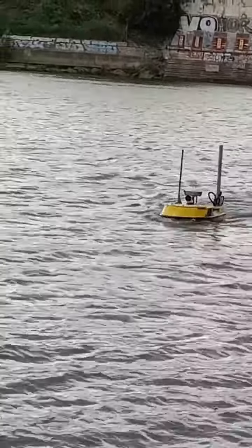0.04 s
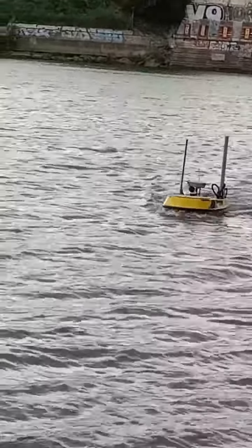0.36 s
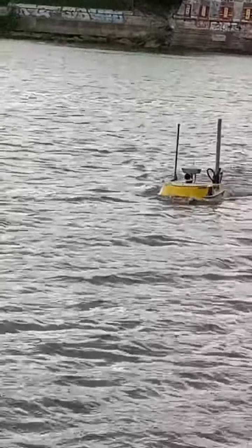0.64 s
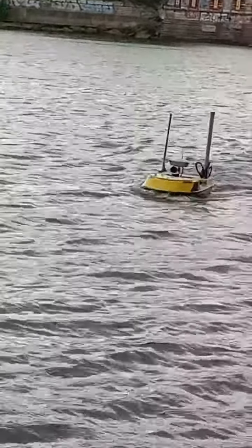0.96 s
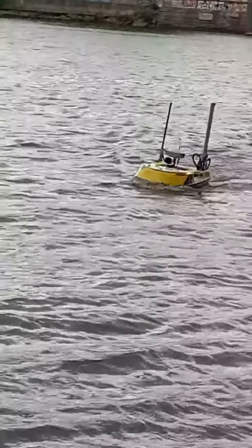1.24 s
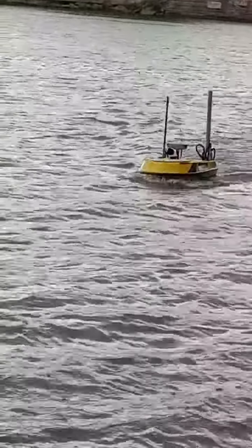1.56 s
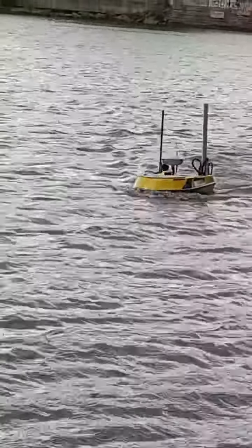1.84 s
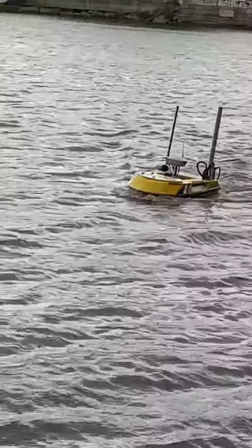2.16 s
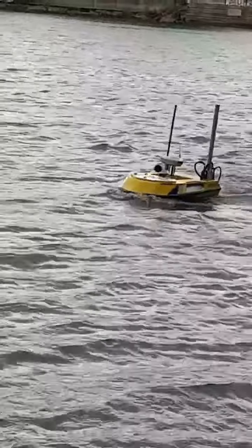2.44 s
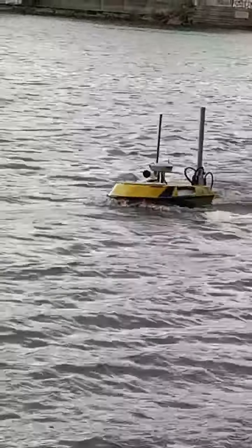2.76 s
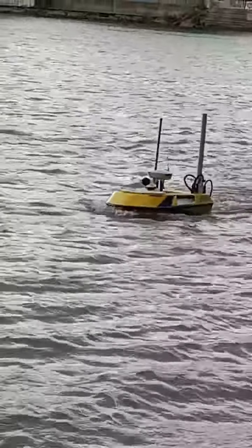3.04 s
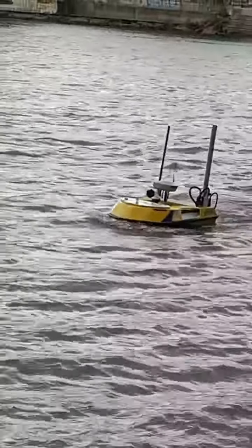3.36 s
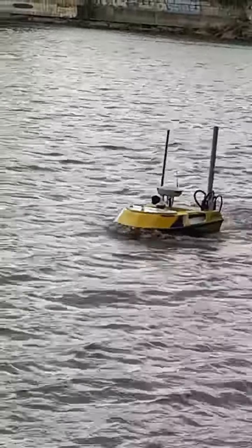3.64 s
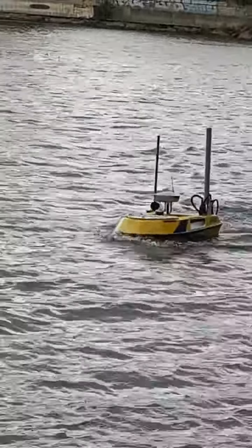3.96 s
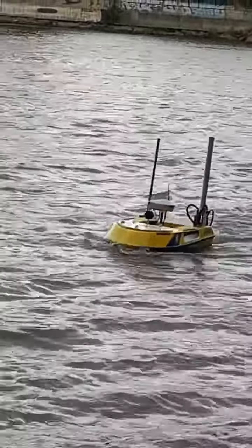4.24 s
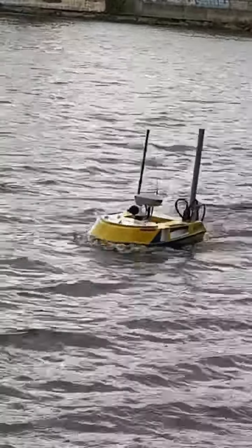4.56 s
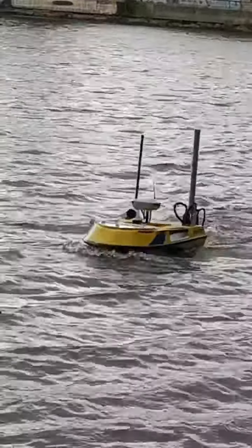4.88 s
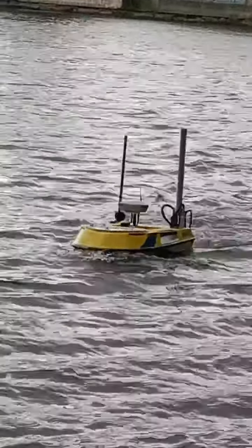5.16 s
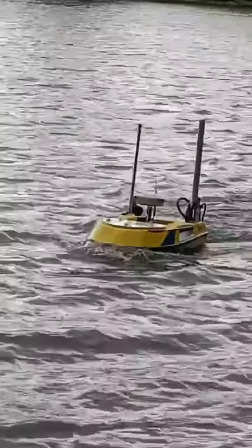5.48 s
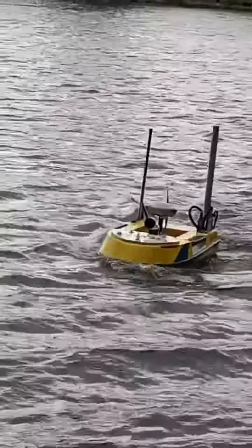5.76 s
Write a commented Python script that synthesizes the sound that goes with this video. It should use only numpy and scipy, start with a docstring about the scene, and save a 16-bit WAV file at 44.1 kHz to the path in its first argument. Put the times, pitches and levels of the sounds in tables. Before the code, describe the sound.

Strong wind buffets a hand-held microphone on a river bank for about six seconds, a loud low rumble with irregular thumps and flaps from the start. Behind it, choppy water washes and laps with small splashes and drips, and a small boat's motor gives a faint, high, wavering whine. From about 1.2 seconds the gust builds with a hollow boom and short rough rasps, peaking near 1.9 seconds, where the sound is briefly squashed. The rasps continue until about 2.7 seconds. The whine fades almost away near 2.8 seconds and is back by 3.8. Small waves tumble over in short grainy rushes from 3.7 to 4 seconds. Three faint, very high, raspy chirps pass between 4.1 and 4.6 seconds as the wind eases. A softer rumble with occasional thumps continues over the water and whine, with one small splash just before the end.

```python
"""Strong wind buffets a hand-held microphone on a river bank. From the start, eddies thump and flap on
its port; behind them choppy water washes and splashes, and a small survey boat whines faintly.
The gust builds with a hollow boom and a rasp, peaks near 1.9 s and drives the limiter.
The whine fades and returns, waves tumble over from 3.7 s, and three very high chirps pass
from 4.1 s as the wind eases."""
import sys
import numpy as np
from scipy import signal
from scipy.fft import rfft, irfft, next_fast_len
from scipy.io import wavfile
from scipy.ndimage import uniform_filter1d, minimum_filter1d

SR = 44100
rng = np.random.default_rng(int(sys.argv[2]) if len(sys.argv) > 2 else 0)


def master(y):
    """Save y as 16-bit WAV."""
    cut = np.clip(np.atleast_2d(y).T, -1, 1)
    pcm = np.round(cut * 32767)  # scale
    wavfile.write(sys.argv[1], SR, pcm.astype(np.int16))


N = 265129
CUTOFF_HZ = 13100

# Wind force on the port. Each row: time in seconds, force in dB re the steady breeze.
GUST = [(0, 4.5), (.22, -0.5), (.33, 5), (.48, 3), (.68, 2.5), (.77, 4.5), (1.12, 3), (1.3, 5.5),
        (1.62, 6.5), (1.88, 11), (2.16, 4.5), (2.4, 6), (2.9, 5.5), (3.58, 4), (4.02, 4.5), (4.3, 0),
        (5.2, -0.5), (6.0, -2.5)]
# Single eddies. Each row: centre in seconds, length in seconds, pitch in Hz, relative peak in dB.
THUMPS = [(0.033, 0.037, 167, -3), (0.073, 0.022, 217, -2), (0.137, 0.03, 94.3, 0), (0.356, 0.022, 432, -7),
          (0.516, 0.014, 210, 2), (0.54, 0.049, 111, -2), (0.722, 0.048, 100, -6), (0.837, 0.035, 96, -2.5),
          (0.883, 0.035, 234, -0.5), (0.995, 0.042, 431, -6.5), (1.13, 0.014, 191.5, 3.5),
          (1.238, 0.024, 209, -4.5), (1.295, 0.036, 520, -14), (1.327, 0.0092, 421, 2),
          (1.354, 0.049, 165.8, 0.5), (1.4, .035, 448.6, -7), (1.475, 0.058, 181.3, -6),
          (1.56, 0.085, 184.6, -6), (1.756, 0.062, 480, -6), (1.811, 0.044, 335, -1),
          (2.025, 0.067, 175.1, -1), (2.15, .06, 114, -2), (2.313, 0.037, 204.7, -5.5),
          (3.208, 0.04, 112.4, -0.5), (3.281, 0.021, 173, 1.5), (3.412, 0.036, 110.5, -7),
          (3.846, 0.044, 80, -3), (4.53, 0.038, 210, -4.5), (4.923, 0.03, 105.3, -4.5),
          (5.575, 0.023, 93.7, 0.5), (5.87, 0.069, 83.2, -5.5), (5.973, 0.023, 106.3, -6)]
# Slaps of small eddies. Each row: start in seconds, relative peak in dB.
FLAPS = [(.06, -5.5), (.304, -4.5), (.369, -2), (.394, -4), (.448, 1), (.471, 1), (.497, -5), (.589, -2),
         (.749, -1.5), (.784, -4.5), (1.094, -7.5), (1.168, -4), (1.253, 0), (1.284, -2), (1.386, -2.5),
         (1.551, -1), (1.656, -6.5), (1.708, -7), (1.843, -11), (1.868, 0.5), (1.896, 5), (2.061, -3),
         (2.236, -3.5), (2.369, -10), (2.482, -9), (2.571, -7.5), (2.851, -8), (2.923, -6), (5.175, -4.5)]
# Choppy water. Each row: time in seconds, relative wash level in dB, relative spray level in dB.
CHOP = [(0, -31.5, -44), (1.2, -35.5, -48), (1.8, -36, -48.5), (2.0, -31, -43.5), (3.05, -32.5, -42.5),
        (3.55, -33, -44.5), (3.85, -28.5, -41), (4.25, -31.5, -45), (5.0, -32, -47.5), (6.0, -33.5, -46)]


def from_db(db):
    """Decibels to gain."""
    return 10 ** (np.asarray(db) / 20)


def unit_rms(x):
    """Scale to rms 1."""
    return x / np.sqrt(np.mean(x ** 2) + 1e-20)


def curves(rows):
    """Value columns of a time table, interpolated to every sample."""
    times_s, *columns = np.transpose(rows)
    return [np.interp(np.arange(N) / SR, times_s, column) for column in columns]


def swell(centre_s, length_s):
    """Gaussian bump: peak 1, length_s wide at 1/e."""
    return np.exp(-np.minimum((2 * (np.arange(N) / SR - centre_s) / length_s) ** 2, 60))


def drift(rate_hz):
    """Random wander, rms about 1, rolling off above rate_hz."""
    hop, settle = 40, 2000
    pole = np.exp(-2 * np.pi * hop * rate_hz / SR)
    noise = rng.standard_normal(N // hop + settle + 2)
    slow = signal.lfilter([1], [1, -2 * pole, pole * pole], noise)[settle:]
    return np.interp(np.arange(N) / hop, np.arange(len(slow)), unit_rms(slow))


def butterworth(x, hz, kind, order=2):
    """Low- or high-pass."""
    return signal.sosfilt(signal.butter(order, hz, kind, fs=SR, output="sos"), x)


def resonance(x, hz, width_hz):
    """Two-pole resonator, peak gain 1."""
    r = np.exp(-np.pi * width_hz / SR)
    feedback = [1, -2 * r * np.cos(2 * np.pi * hz / SR), r * r]
    return signal.lfilter(np.array([1, 0, -1]) * (1 - r * r) / 2, feedback, x)


def coloured(spectrum, low_hz=15):
    """Noise, rms 1, shaped by (Hz, dB) points; rolls off an octave above the last."""
    points_hz, points_db = np.transpose(spectrum)
    hz = np.arange(N // 2 + 1) * SR / N + 1e-3
    shape_db = np.interp(np.log(hz), np.log(points_hz), points_db)
    gain = from_db(shape_db) * (hz > low_hz) / (1 + (hz / points_hz[-1] / 2) ** 4)
    return unit_rms(irfft(rfft(rng.standard_normal(N)) * gain, N))


def evened(x, share):
    """Remove a share of a noise's random swelling: a steady stream of like-sized eddies."""
    envelope = np.abs(signal.hilbert(x, next_fast_len(N))[:N])
    return unit_rms(x / (uniform_filter1d(envelope, size=900) + 0.13) ** share)


def stalls_db(depth_db=7.5, stall_s=0.0086):
    """Fine eddies pause just before each listed slap."""
    return -depth_db * sum(swell(start_s - stall_s / 2, 2 * stall_s) for start_s, _ in FLAPS)


def lumps_db(spread_db=1.24, rate_hz=9.5):
    """Quick swells and sags of the flow about its trend."""
    flow = drift(rate_hz)
    return spread_db * unit_rms(flow - uniform_filter1d(flow, size=SR // 4))


def lulls_db(length_s=0.05):
    """The flow leaves the port for a moment."""
    # Each row: centre in seconds, depth in dB.
    dips = [(.1, 7), (.19, 3), (.68, 3.5), (1.06, 2), (1.15, 6), (4.35, 1.5), (4.98, 3), (5.7, 2),
            (5.82, 2)]
    return -sum(depth_db * swell(centre_s, length_s) for centre_s, depth_db in dips)


def buffeting(rumble_db=-14.5, eddy_db=-15.5, flutter_db=-24.5, steady=0.38, burst_db=2.0, swap_db=1.0):
    """Large eddies rumble; small ones grow fastest with the gust, in bursts that displace mid-size ones."""
    # Spectra of large, mid-size and small eddies. Each row: frequency in Hz, relative density in dB.
    rumble_spectrum = [(20, -44), (42, -28), (54, -46), (63, -11.5), (73, 2.5), (97, 4.5), (125, 2.5),
                       (160, -10.5), (260, -45)]
    eddy_spectrum = [(70, -51), (115, -9), (155, -0.5), (190, -2.5), (235, -1.5), (290, -5.5), (350, -10),
                     (480, -27), (900, -50)]
    flutter_spectrum = [(180, -12), (300, -6.5), (380, -0.5), (460, -1), (550, -4.5), (660, -15),
                        (800, -19.5), (1100, -26.5), (1600, -48), (3000, -50.5)]
    gust_db, = curves(GUST)
    bursts = drift(rate_hz=50)
    large = from_db(rumble_db + 0.093 * gust_db) * evened(coloured(rumble_spectrum), steady)
    middle = evened(coloured(eddy_spectrum), steady)
    middle *= from_db(eddy_db + 0.76 * gust_db - swap_db * bursts)
    small = evened(coloured(flutter_spectrum) * from_db(burst_db * bursts), steady / 2)
    small *= from_db(flutter_db + 1.52 * gust_db + stalls_db())
    return from_db(lumps_db() + lulls_db()) * (large + middle + small)


def thumps(gain_db=-2.5, wander=0.13, ragged_db=2.0):
    """An eddy rolls over the port: a few ragged pressure swings, deep if large, hollow if small."""
    warped_s = np.cumsum(1 + wander * drift(rate_hz=70)) / SR
    swings = np.zeros(N)
    for centre_s, length_s, hz, db in THUMPS:
        phase = 2 * np.pi * (hz * warped_s + rng.random())
        swings += from_db(db + gain_db) * swell(centre_s, length_s) * np.sin(phase)
    return swings * from_db(ragged_db * drift(rate_hz=82))


def displacement(depth_db=3):
    """Gain of the turbulence while one big eddy pushes the others off the port."""
    return from_db(-depth_db * sum(swell(centre_s, length_s) for centre_s, length_s, _, _ in THUMPS))


def flaps(gain_db=-4.0, port_hz=450, rise_s=0.0042, rough=0.4, shed_per_s=5, shed_above_db=6):
    """A sudden push and brief turbulence swing the air in the port; hard gusts shed more at random."""
    gust_db, = curves(GUST)
    out, t = np.zeros(N), np.arange(SR // 10) / SR
    shed_at = np.flatnonzero((rng.random(N) < shed_per_s / SR) & (gust_db > shed_above_db))
    shed_db = 4.5 + 3.5 * rng.standard_normal(N)
    for start_s, db in list(FLAPS) + [(at / SR, shed_db[at]) for at in shed_at]:
        push = rough * rng.standard_normal(len(t)) * t / rise_s * np.exp(-t / rise_s)
        push[0] += rng.choice([-1, 1]) * 2
        swing = resonance(push, port_hz * np.exp(0.031 * rng.standard_normal()), width_hz=120)
        swing = butterworth(swing, 720, "low", order=3)
        swing = butterworth(swing, 117, "high")
        at = int(start_s * SR)
        peak = from_db(db + gain_db + 0.23 * gust_db[at])
        out[at:at + len(t)] += (peak * swing / np.abs(swing).max())[:N - at]
    return out


def lapping_db(rise_s=0.044, fall_s=0.015):
    """Each nearby wave builds up and drops away quickly."""
    # Each row: crest time in seconds, height above the chop in dB.
    laps = [(.27, 2.5), (.69, 4), (.82, 2.5), (1.07, 5), (1.95, 7), (2.22, 0.5), (3.04, 5), (3.33, 2.5),
            (3.7, 2), (3.95, 1.5), (4.025, 2.5), (4.38, 2)]
    t = np.arange(N) / SR
    return sum(db * np.exp(-((t - crest_s) / np.where(t < crest_s, rise_s, fall_s)) ** 2)
               for crest_s, db in laps)


def patchy(x, depth_db, frame=512, patch_bins=6, patch_hops=7):
    """Each wavelet has its own colour: random patches of the spectrum swell and fade."""
    spectra = signal.stft(x, nperseg=frame)[2]
    patches = rng.standard_normal(spectra.shape[-2:])
    patches = uniform_filter1d(patches, size=patch_bins, axis=0)
    patches = uniform_filter1d(patches, size=patch_hops, axis=1)
    return signal.istft(spectra * from_db(depth_db * unit_rms(patches)), nperseg=frame)[1][..., :N]


def water(wash_gain_db=3.0, spray_gain_db=0.5, side_db=-4.0, surge_db=0.5, grain_db=1.0):
    """Many small waves wash at once; their spray is grainier and wider than their body."""
    # Spectra of wave body and spray. Each row: frequency in Hz, relative density in dB.
    wash_spectrum = [(200, -0.5), (750, 3.5), (1150, 3.5), (1600, -0.5), (2100, 0), (2450, -4.5),
                     (3500, -7.5), (3950, -8), (4400, -17), (5500, -33.5)]
    spray_spectrum = [(3000, -17), (4300, 2.5), (5200, 1), (6100, 1), (6900, -3.5), (7700, -9), (8400, -9),
                      (9300, -5.5), (10100, -5), (10800, -3.5), (11500, -8), (13000, -10.5)]
    wash_db, spray_db = curves(CHOP)
    body = from_db(wash_db + wash_gain_db) * coloured(wash_spectrum)
    side = from_db(side_db) * coloured(spray_spectrum, low_hz=4330) * [[1], [-1]]
    fizz = coloured(spray_spectrum) * from_db(grain_db * drift(rate_hz=140))
    spray = from_db(spray_db + spray_gain_db) * (fizz + side)
    surge = from_db(lapping_db() + surge_db * drift(rate_hz=14))
    return surge * patchy(body + spray, depth_db=1.5)


def droplets(per_s=110, level_db=-48, pitches=26, q=25):
    """Drops and tiny bubbles come at random, each ringing at one of many pitches."""
    _, spray_db = curves(CHOP)
    out = np.zeros(N)
    for hz in np.geomspace(1300, 11000, pitches):
        born = rng.random(N) < per_s / pitches / SR
        size_db = -np.minimum(rng.exponential(1, N), 4)
        rings = resonance(born * from_db(size_db) + 1e-18, hz, hz / q)
        out += unit_rms(rings) / hz
    return from_db(level_db + spray_db - spray_db.mean()) * unit_rms(out)


def motor(gain_db=-1.5, wobble=0.035, octave_db=-13):
    """The thruster's whine wavers as the hull pitches in the chop."""
    # Each row: time in seconds, pitch in Hz, relative level in dB.
    whine_track = [(0, 2040, -42), (1.1, 2030, -43), (1.6, 2160, -48), (2.8, 2000, -58), (3.8, 2000, -43),
                   (4.8, 2200, -48), (5.45, 2240, -43), (6.0, 2100, -39.5)]
    hz, db = curves(whine_track)
    phase = 2 * np.pi * np.cumsum(hz * (1 + wobble * drift(rate_hz=60))) / SR
    whine = np.sin(phase) + from_db(octave_db) * np.sin(2 * phase)
    return from_db(db + gain_db) * unit_rms(whine * (1 + drift(rate_hz=24)))


def rough_band(events, hz, width_hz, grain_db, grain_hz):
    """Grainy noise band that swells at each (centre s, length s, level dB) event."""
    envelope = sum(from_db(db) * swell(centre_s, length_s) for centre_s, length_s, db in events)
    broad = resonance(rng.standard_normal(N), hz, 2 * width_hz)
    band = resonance(broad, hz, width_hz)
    return envelope * unit_rms(band * from_db(grain_db * drift(grain_hz)))


def rasp():
    """The finest eddies tear at the port's edge in short, rough flares."""
    # Each row: centre in seconds, length in seconds, level in dB.
    flares = [(.32, .04, -32), (.4, 0.078, -35), (0.46, 0.025, -34), (1.178, 0.022, -25),
              (1.284, 0.053, -32), (1.452, 0.01, -19), (1.582, .06, -33), (1.74, 0.063, -30),
              (1.883, 0.061, -16), (1.937, .03, -15), (2.044, .015, -24), (2.087, .03, -20.5),
              (2.267, 0.052, -28.5), (2.356, .05, -24.5), (2.53, 0.096, -25), (2.62, 0.039, -23.5),
              (2.688, .014, -25)]
    return rough_band(flares, hz=770, width_hz=250, grain_db=4.0, grain_hz=110)


def splashes(gain_db=0.5, drops_per_s=2000, drop_db=-4, spread_db=3.0, pitch_spread=0.27, q=7, snap=0.76):
    """A crest breaks: one sharp tick, then a dying cluster of drops, each a snap and a short ring."""
    # Each row: start in seconds, relative peak in dB, pitch in Hz, cluster time scale in seconds.
    crests = [(.361, -26, 4170, 0.0071), (0.41, -26, 4430, 0.014), (1.816, -32, 6470, .006),
              (2.6135, -25, 9050, .01), (2.677, -28, 9250, .012), (2.743, -22, 4000, .002),
              (2.7505, -24, 7500, .001), (3.255, -27, 6950, 0.0088), (3.786, -24, 3900, .008),
              (3.802, -22.5, 6060, 0.0083), (3.851, -29, 6240, .005), (4.012, -25, 3400, 0.011),
              (4.351, -37, 5700, .012), (4.624, -28, 5500, .016), (5.361, -30, 6640, 0.011),
              (5.956, -21, 6200, .006)]
    out, t = np.zeros(N), np.arange(SR // 50) / SR
    for start_s, db, hz, cluster_s in crests:
        drops = rng.standard_normal((30, 3))[:1 + int(cluster_s * drops_per_s)]
        for k, (lag, size, detune) in enumerate(drops):
            later = min(k, 1)   # 0 for the leading tick: no scatter
            delay_s = later * cluster_s * abs(lag) * 0.91
            ring_hz = min(hz * np.exp(later * pitch_spread * detune), CUTOFF_HZ)
            tick = np.sin(2 * np.pi * ring_hz * t) * np.exp(-np.pi * ring_hz * t / q)
            tick[:2] += [snap, -snap]
            tick *= from_db(db + gain_db + later * (drop_db + spread_db * size))
            at = int((start_s + delay_s) * SR)
            out[at:at + len(t)] += tick[:max(N - at, 0)]
    return out


def plips(t60_s=0.029, rise_per_s=3.6, attack_s=0.0013):
    """A bubble rings briefly, rising in pitch as it reaches the surface."""
    # Each row: start in seconds, relative level in dB, starting pitch in Hz.
    bubbles = [(0.41, -18.5, 4450), (1.876, -11, 1740), (2.676, -25.5, 9140), (2.816, -25, 5220),
               (3.087, -14, 1840), (3.801, -22.5, 6120), (3.851, -23.5, 6250), (4.35, -27, 5800)]
    out, t = np.zeros(N), np.arange(SR // 10) / SR
    for start_s, db, hz in bubbles:
        envelope = from_db(db - 60 * t / t60_s) * (1 - np.exp(-t / attack_s))
        at = int(start_s * SR)
        out[at:at + len(t)] += envelope * np.sin(2 * np.pi * hz * t * (1 + rise_per_s * t / 2))
    return out


def boom(width_hz=40):
    """Eddies shed almost regularly from the port's edge: a hollow band that sinks as the gust dies."""
    # Each row: time in seconds, pitch in Hz, level in dB.
    shedding_track = [(1.15, 179.9, -40), (1.38, 174.8, -9), (1.8, 190, -20), (2.05, 200, -16),
                      (2.7, 174.4, -15.5), (3.3, 135, -15), (4.2, 135, -27)]
    hz, db = curves(shedding_track)
    phase = 2 * np.pi * np.cumsum(hz) / SR
    in_phase, quadrature = (butterworth(drift(width_hz), 2 * width_hz, "low") for _ in range(2))
    band = in_phase * np.cos(phase) + quadrature * np.sin(phase)
    return from_db(db) * evened(band, share=1.0)


def sloshes():
    """A wave tumbles over: a short, grainy rush of churned water."""
    # Each row: centre in seconds, length in seconds, level in dB.
    tumbles = [(3.696, .06, -31), (3.795, .04, -31), (3.935, 0.091, -32), (4.017, 0.041, -30)]
    return rough_band(tumbles, hz=1650, width_hz=1200, grain_db=5.5, grain_hz=160)


def chirps(hz=11350, width_hz=500, rasp_db=3.5):
    """A narrow, raspy, very high band swells and fades three times."""
    # Each row: centre in seconds, length in seconds, level in dB.
    pulses = [(4.163, 0.099, -44), (4.355, 0.15, -45), (4.533, 0.15, -46)]
    t = np.arange(N) / SR
    envelope = sum(from_db(db) * np.exp(-(2 * (t - centre_s) / length_s) ** 4)
                   for centre_s, length_s, db in pulses)
    band = butterworth(resonance(rng.standard_normal((2, N)), hz, width_hz), 9500, "high")
    band += band.mean(axis=0)   # narrows the stereo image
    return envelope * unit_rms(band * from_db(rasp_db * drift(rate_hz=50)))


def scene(low_cut_hz=57):
    """Mono wind over the stereo river; the microphone sheds the deepest pressure swings."""
    river = water() + sloshes() + droplets() + splashes() + plips() + motor() + chirps()
    wind = displacement() * (buffeting() + boom()) + thumps() + flaps() + rasp()
    return river + butterworth(wind, low_cut_hz, "high", order=8)


def limiter(x, ceiling=0.84, attack_s=0.0053, release_db_per_s=128):
    """Looks ahead, turns everything down under each peak, recovers steadily."""
    window = int(attack_s * SR)
    over_db = np.maximum(20 * np.log10(np.abs(x).max(axis=0) / ceiling + 1e-9), 0)
    release_db = release_db_per_s * np.arange(N) / SR
    gain = from_db(release_db - np.maximum.accumulate(over_db + release_db))
    return x * uniform_filter1d(minimum_filter1d(gain, window), window)


def record(dry):
    """The limiter holds the gusts down; a steep low-pass cuts the top."""
    low_pass = signal.ellip(12, 0.2, 80, CUTOFF_HZ, fs=SR, output="sos")
    return signal.sosfilt(low_pass, limiter(dry))


dry = scene()
out = record(dry)
master(out)
```